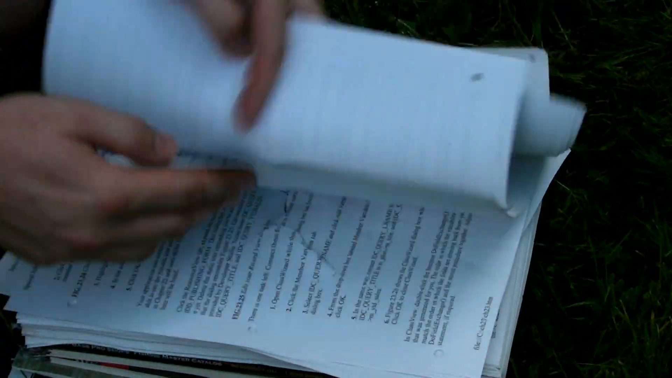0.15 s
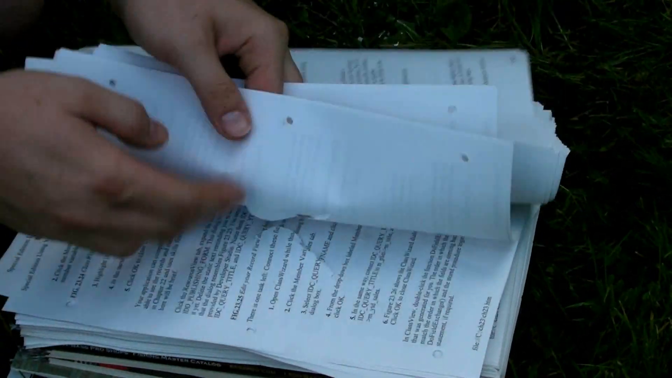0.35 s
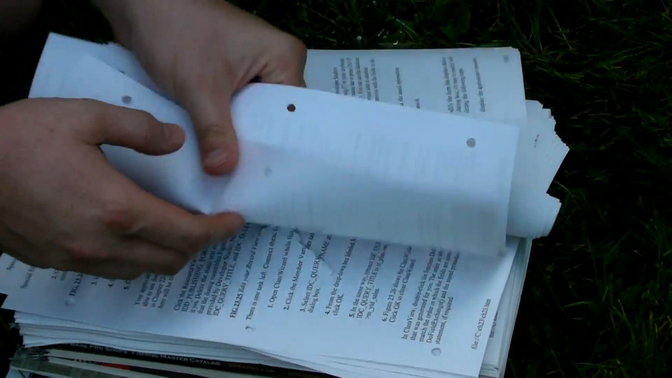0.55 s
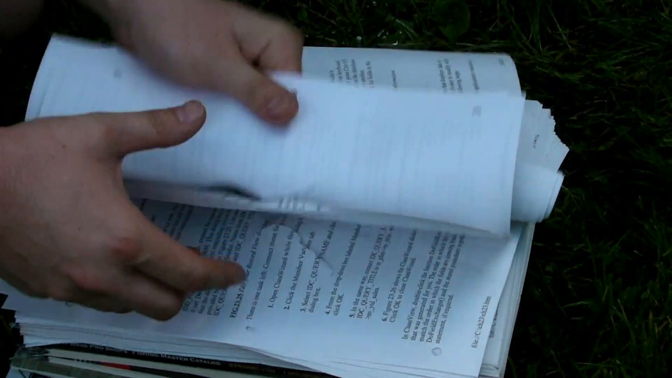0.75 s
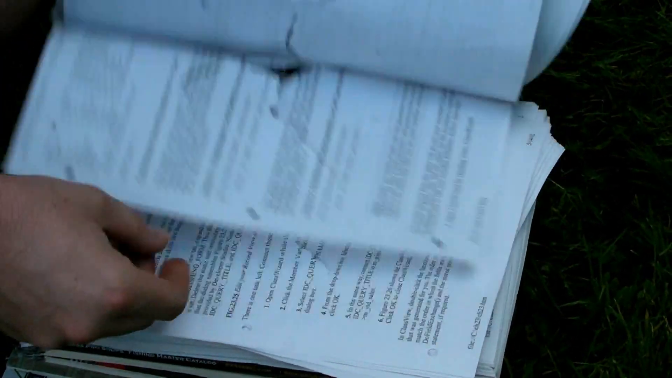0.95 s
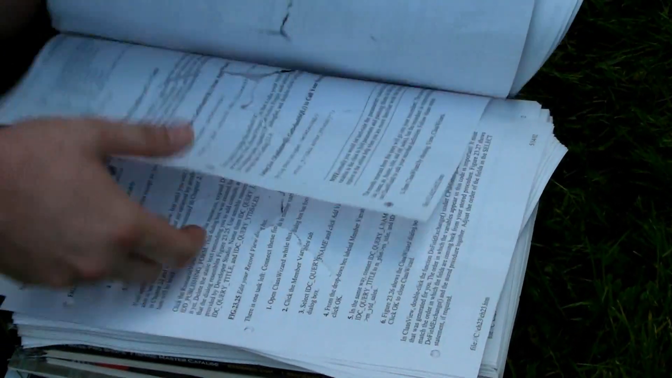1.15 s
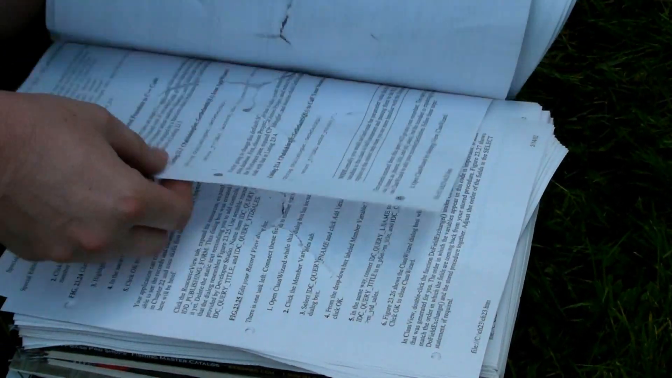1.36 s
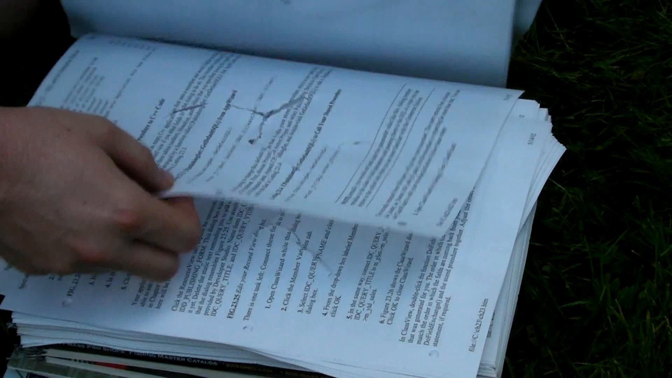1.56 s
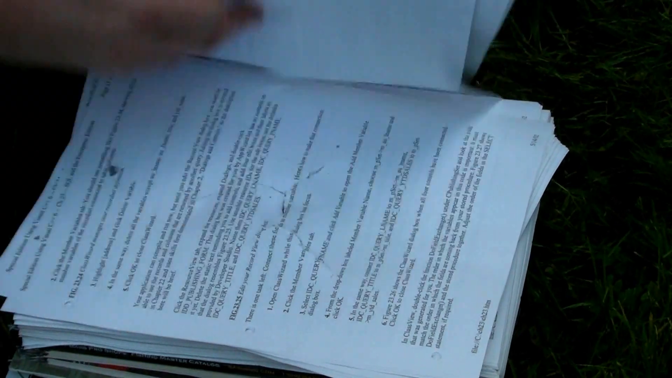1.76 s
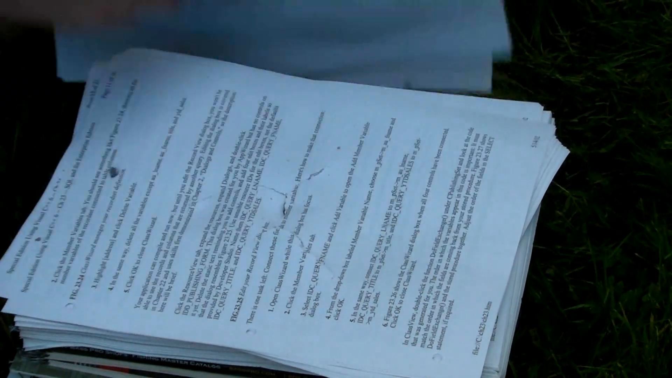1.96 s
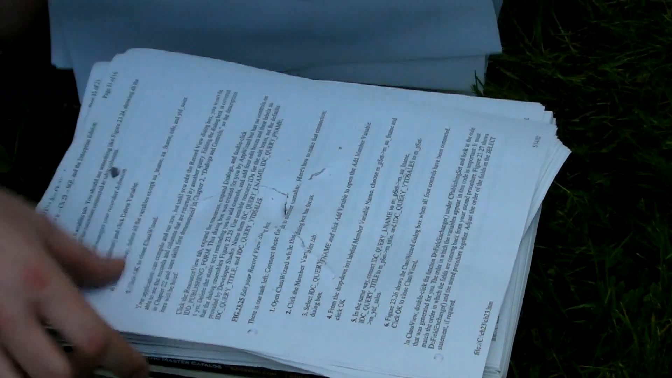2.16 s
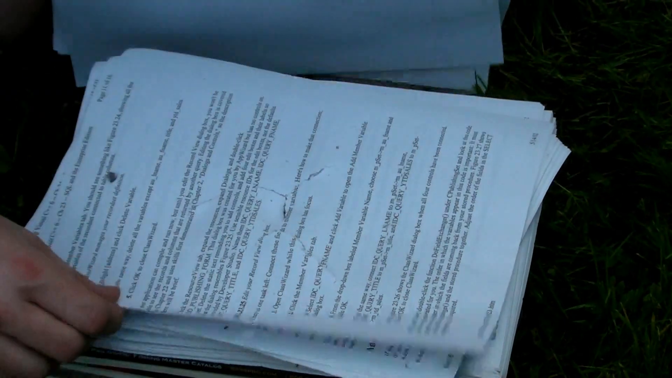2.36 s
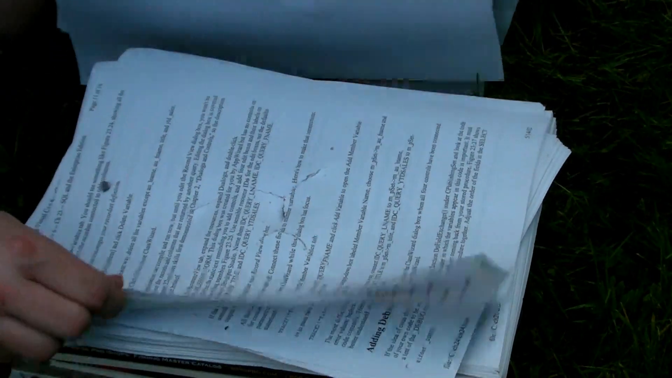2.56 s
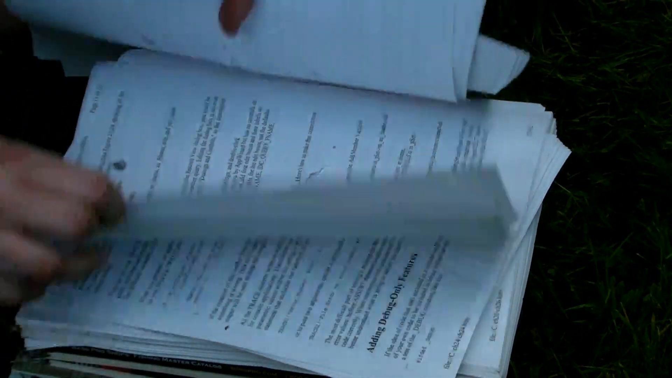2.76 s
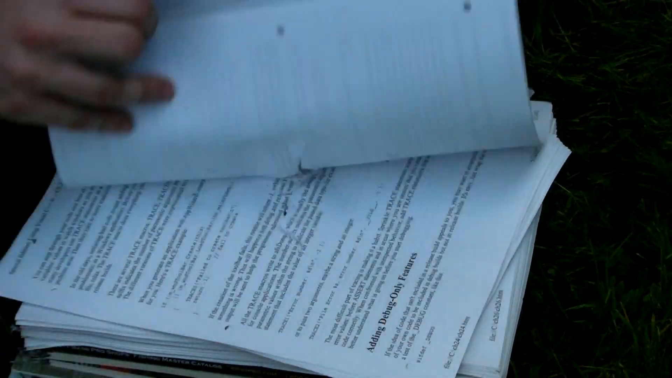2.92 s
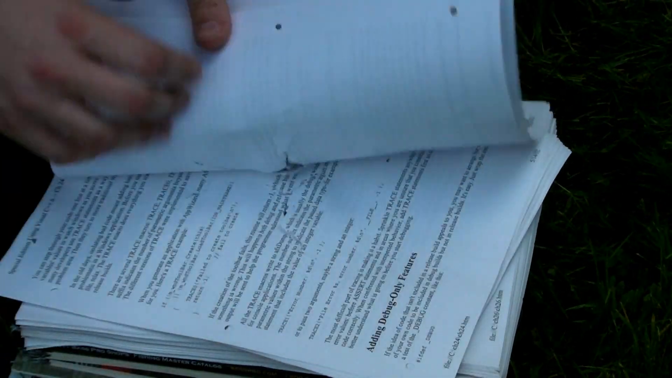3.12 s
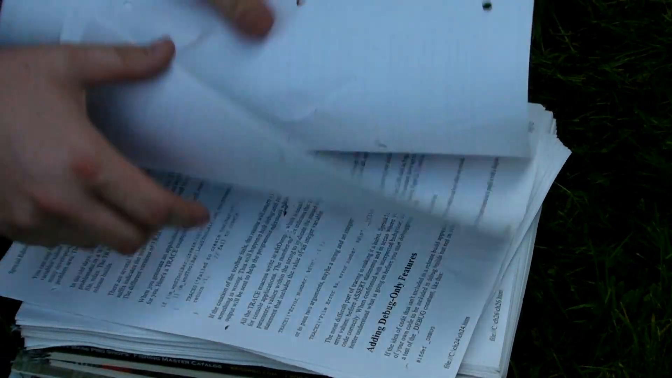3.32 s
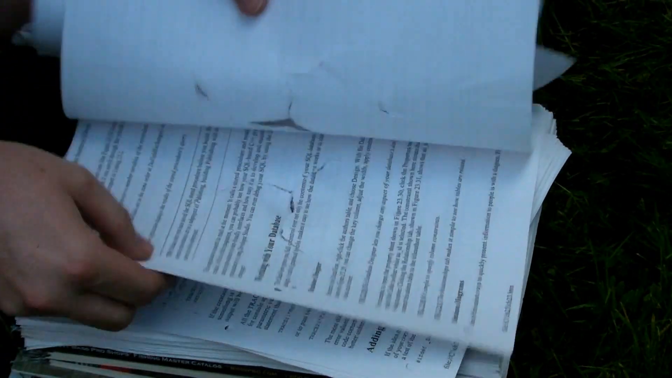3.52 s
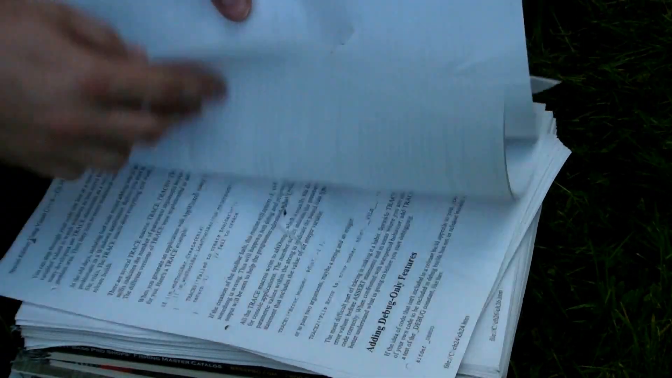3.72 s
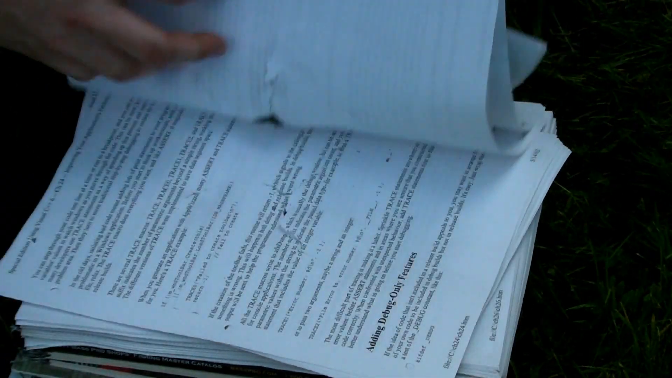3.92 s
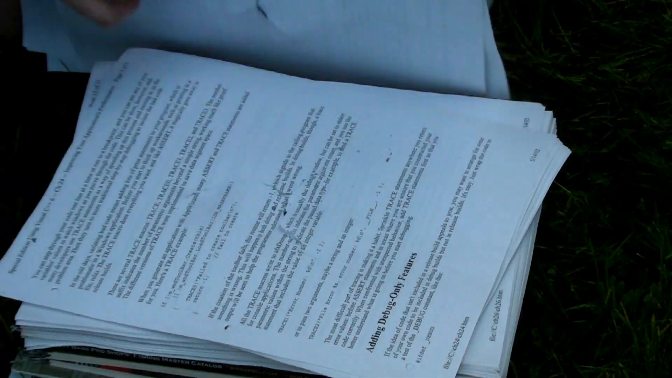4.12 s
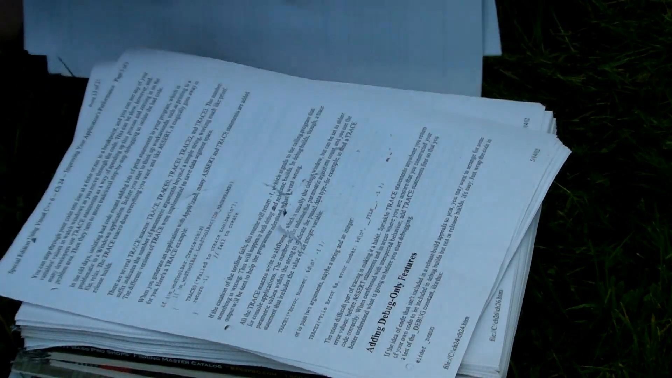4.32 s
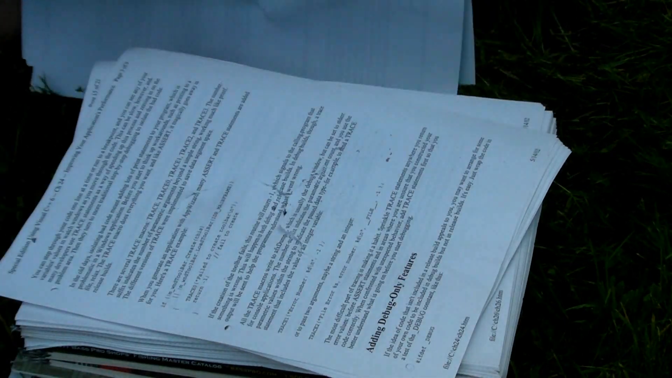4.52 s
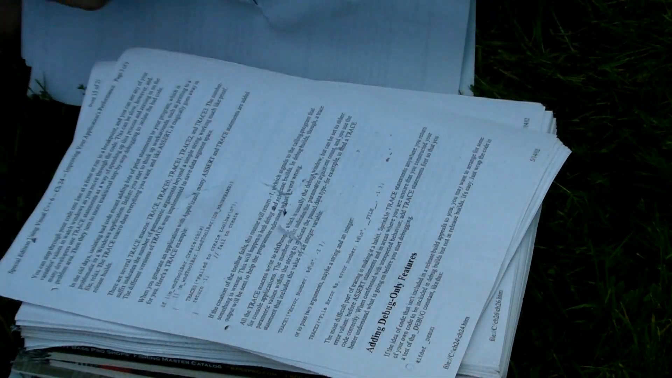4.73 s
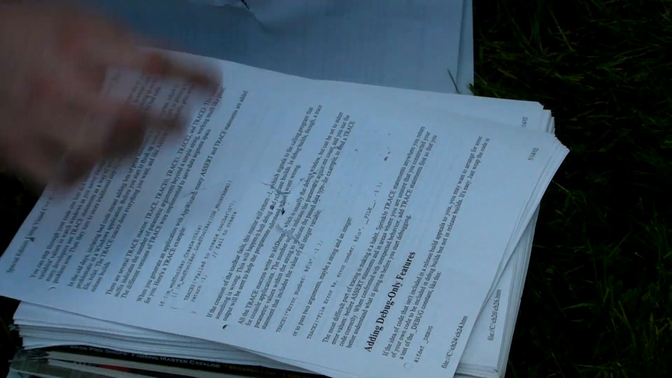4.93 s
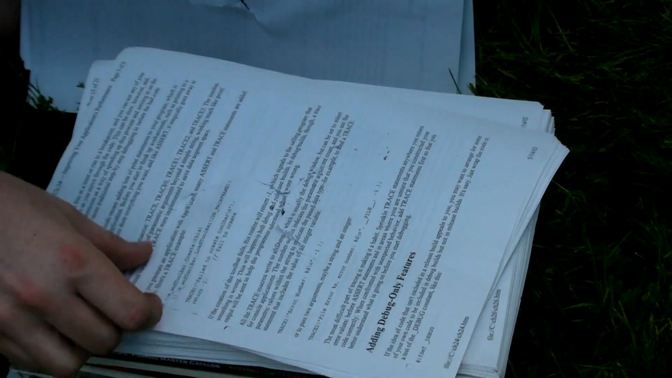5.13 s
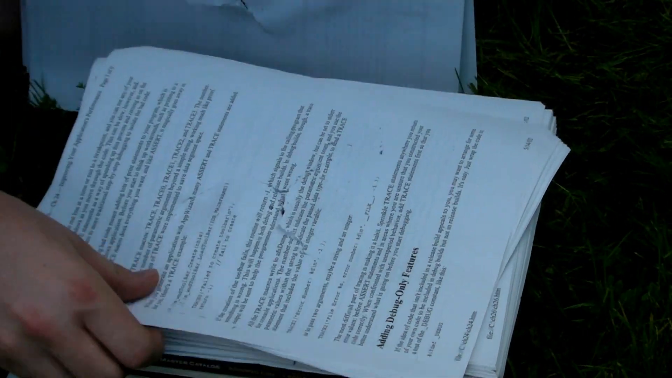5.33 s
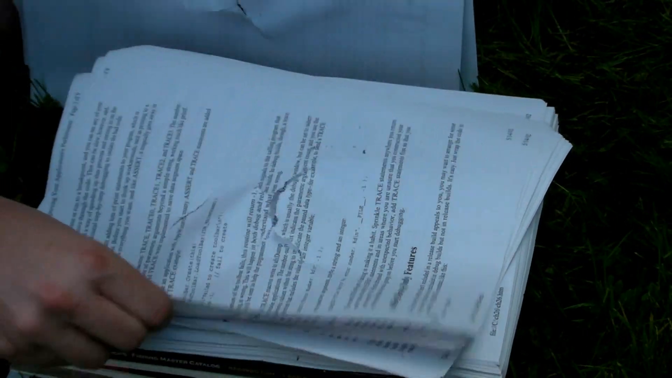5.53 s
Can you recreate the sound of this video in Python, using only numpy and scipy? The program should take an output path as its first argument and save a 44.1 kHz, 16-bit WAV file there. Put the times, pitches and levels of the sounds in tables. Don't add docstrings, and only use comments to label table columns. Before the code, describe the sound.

A thick stack of paper is leafed through by hand on grass, dry and very close to a small camera's stereo microphones. It starts with soft rustling; at 0.3 s a bundle flaps crisply, then bright swishes build from 0.5 s to a very hard snap at 0.7 s. Lighter swishes and ticks follow from 0.9 to 1.75 s. The loudest dragging scrape, with crackles, falls at 1.9-2.1 s, then a softer pause. Sheets swish again at 2.65-2.95 s, flap strongly at 3.1 s with brief airy falling hisses, and snap sharply at 3.48 and 3.64 s. Soft pats and fading slides last until about 4.3 s. Near quiet follows, with sparse ticks and a faint bird chirping around 4.75 s and 5.2-5.5 s, after barely audible chirps near 3.1-3.4 s. A crisp page lift bursts at 5.57 s. Low distant traffic hum and airy noise continue throughout.

```python
import sys
import numpy as np
from scipy import signal
from scipy.io import wavfile
from scipy.ndimage import uniform_filter1d

SR = 44100
rng = np.random.default_rng(int(sys.argv[2]) if len(sys.argv) > 2 else 0)


def nominal_scale(level):
    x = np.asarray(level, float) / 20
    return 10 ** x


def file_out(sig):
    cols = np.atleast_2d(sig).T
    lim = np.clip(cols, -1, 1)
    pcm = np.round(lim * 32767).astype(np.int16)
    wavfile.write(sys.argv[1], SR, pcm)


N = 246062

# frequency in Hz, left minus right in dB.
PORTS = [(60, -1), (180, -1.5), (550, -1), (1650, -1), (2800, -3), (4970, 1), (15000, 0)]
OPPOSITE = np.array([[1], [-1]])


def rms_one(x):
    return x / np.sqrt(np.mean(x ** 2) + 1e-20)


def at_hz(points, hz):
    points_hz, values = np.transpose(points)
    return np.interp(np.log(hz), np.log(points_hz), values)


def drift(rate_hz):
    r = np.exp(-16 * np.pi * rate_hz / SR)
    slow = signal.lfilter([1], [1, -2 * r, r * r], rng.standard_normal(N // 8 + 4002))
    slow = slow[4000:]
    return np.interp(np.arange(N) / 8, np.arange(len(slow)), rms_one(slow))


def band(x, low_hz, high_hz):
    sos = signal.butter(2, [low_hz, min(high_hz, .45 * SR)], "band", fs=SR, output="sos")
    return signal.sosfilt(sos, x)


def low_pass(x, top_hz):
    return signal.sosfilt(signal.ellip(12, .5, 60, top_hz, fs=SR, output="sos"), x)


def resonance(x, hz, width_hz):
    return signal.lfilter(*signal.iirpeak(hz, hz / width_hz, fs=SR), x)


def noise_bank(gain_db_at, likeness):
    out = 0
    white = rng.standard_normal((2, 2, N))
    edges_hz = 20 * 2 ** (np.arange(30) / 3)
    for k, (low, high) in enumerate(zip(edges_hz, edges_hz[1:])):
        mid, side = band(white[k % 2], low, high)
        hz = np.sqrt(low * high)
        alike = np.clip(at_hz(likeness, hz), 0, 1)
        pair = np.sqrt(1 + alike) * mid + np.sqrt(1 - alike) * side * OPPOSITE
        balance = nominal_scale(at_hz(PORTS, hz) / 2 * OPPOSITE)
        out = out + nominal_scale(gain_db_at(hz)) * balance * pair
    return out


def strokes():
    # time in s, hiss in dB, centre of the air-gap resonance in Hz.
    handling = [(0, -53.5, 2500), (.28, -41.5, 3850), (.4, -49, 2500), (.5, -39, 3850), (.82, -49, 4300),
                (1.1, -49, 3800), (1.25, -60, 3100), (1.62, -43, 3800), (1.8, -45, 2900),
                (2.28, -46.5, 2340), (2.5, -53.5, 2680), (2.98, -48.5, 3200), (3.45, -52, 3200),
                (3.85, -44.5, 2640), (4.5, -53.5, 3600), (5.18, -56, 3980), (5.42, -50.5, 3600),
                (5.58, -44.5, 3600)]
    # peak in s, hiss in dB, rise in s, fall in s,
    # bright edge in dB re hiss.
    swishes = [(.095, -42, 0.086, 0.083, -12), (.315, -57, 0.19, 0.044, 1),
               (0.532, -33, 0.015, 0.067, -3.5), (.629, -29.5, 0.083, 0.049, -7.5),
               (0.727, -34, 0.069, 0.053, -10), (.968, -34.5, 0.12, 0.42, -13),
               (1.491, -30, 0.12, 0.14, -10.5), (1.774, -42, 0.38, .008, -11.5),
               (1.915, -39.5, 0.025, 0.15, -5), (2.0, -36.5, 0.034, 0.047, -10.5),
               (2.664, -32, 0.044, 0.056, -12.5), (2.827, -34.5, 0.051, 0.061, -16),
               (2.928, -36.5, 0.054, 0.01, -16), (3.176, -31.5, 0.015, 0.22, -12),
               (3.527, -35.5, 0.1, 0.18, -13), (3.628, -34, 0.022, 0.16, -9.5),
               (3.722, -34, 0.039, 0.38, -16), (4.026, -37.5, 0.093, .25, -13.5),
               (4.161, -41, 0.67, 0.067, -11), (4.27, -44, 0.04, 0.37, -14),
               (4.57, -44.5, 0.1, 0.066, -14.5), (4.685, -43.5, 0.11, 0.097, -14.5),
               (4.909, -42, 0.025, 0.072, -14.5), (5.577, -33, 0.037, .05, -6)]
    # peak in s, hiss in dB, rise in s, fall in s, gap resonance in Hz.
    drags = [(0.335, -24.5, 0.0076, 0.026, 2800), (2.8, -35, 0.013, 0.075, 2800),
             (.584, -40, .05, 0.087, 3600), (.923, -32, 0.061, 0.02, 2580), (1.093, -37, 0.12, 0.15, 4150),
             (1.318, -34.5, 0.063, 0.033, 4000), (1.671, -38.5, 0.14, 0.061, 2250),
             (1.881, -43, 0.11, .05, 2600), (1.967, -17, 0.0094, 0.021, 2600),
             (1.938, -22, 0.031, 0.038, 2900), (2.06, -23.5, 0.027, 0.031, 2600),
             (3.26, -32, .06, 0.12, 2470), (4.794, -48, 0.19, 0.089, 3060), (5.278, -59, 0.098, 0.31, 4000)]
    # peak in s, hiss in dB, rise in s, fall in s,
    # flapping lows in dB re hiss.
    flaps = [(0.139, -35.5, 0.022, 0.032, -0.5), (.304, -58.5, 0.15, 0.078, 11.5),
             (0.367, -27, 0.031, 0.006, -5), (.629, -27, 0.0094, 0.058, -9.5),
             (1.747, -32, 0.027, 0.0093, -0.5), (1.9, -32, 0.041, 0.23, -8), (2.943, -53, 0.039, 0.018, 17),
             (3.069, -35, 0.066, 0.063, -3.5), (3.117, -25.5, 0.015, 0.018, 0),
             (3.099, -21, 0.0061, 0.022, -11), (3.22, -29.5, 0.019, 0.11, 0.5),
             (3.515, -42.5, 0.013, 0.029, 11), (3.597, -38.5, 0.073, 0.036, -6),
             (3.639, -22.5, 0.0032, 0.036, -4.5), (3.9, -37.5, 0.12, 0.03, -4),
             (4.03, -53.5, 0.45, 0.23, 7.5), (5.577, -45, 0.037, .05, 5)]
    slope_db = 21

    t = np.arange(0, N + 64, 64) / SR
    s, rest_db, rest_hz = np.transpose(handling)
    hiss = nominal_scale(2 * np.interp(t, s, rest_db))
    lows, edge = hiss * nominal_scale(2 * -14), hiss * nominal_scale(2 * -16)
    tuned = hiss * np.interp(t, s, rest_hz)

    rows = [(*row[:4], 4160, -16.5, row[4]) for row in swishes]
    rows += [(*row, -23.5, -29) for row in drags]
    rows += [(*row[:4], 2500, row[4], -27) for row in flaps]
    for peak, db, rise, fall, hz, lows_db, edge_db in rows:
        away = np.maximum((peak - t) / rise, (t - peak) / fall)
        power = nominal_scale(2 * (db - slope_db * away))
        hiss = hiss + power
        lows = lows + power * nominal_scale(2 * lows_db)
        edge = edge + power * nominal_scale(2 * edge_db)
        tuned = tuned + power * hz
    controls = 10 * np.log10(hiss), tuned / hiss, 10 * np.log10(lows), 10 * np.log10(edge)
    return [np.interp(np.arange(N) / SR, t, control) for control in controls]


def sliding():
    # frequency in Hz, level in dB per Hz within each zone.
    sheet = [(250, -34), (500, -41), (750, -4.5), (1300, -7.5), (2500, -2.5), (4200, -5.5), (6500, -10),
             (9000, -8.5), (12000, -12.5), (16000, -18.5)]
    # frequency in Hz, left-right likeness of a source close to the ports.
    near_likeness = [(500, 0.96), (6800, 1), (10000, 0.84), (15000, 0.91)]
    hiss_db, centre_hz, lows_db, bright_db = strokes()

    ticks = (rng.random(N) < 200 / SR) * np.minimum(rng.exponential(.4, N), .8)
    slips_db = 20 * np.log10(1 + signal.lfilter([1], [1, -.97], ticks))
    catching_db = 1.8 * drift(300) + slips_db
    sharpness_db = np.clip((hiss_db + 56) / 4, 2, 6.5)

    def gain_db(hz):
        to_low = np.clip(np.log2(1700 / hz) / 0.41, 0, 1)
        to_high = np.clip(np.log2(hz / 5500) / 0.76, 0, 1)
        gap_db = sharpness_db * (np.exp(-(np.log2(hz / centre_hz) / .27) ** 2) - .6)
        zone_db = (lows_db + 10.0) * to_low + (bright_db + 8.5) * to_high
        zone_db = zone_db + (hiss_db + gap_db + 3.5) * (1 - to_low - to_high)
        return zone_db + at_hz(sheet, hz) + catching_db + 2.02 * drift(22.7)

    return noise_bank(gain_db, near_likeness)


def creases():
    # time in s, peak in dB, pitch in Hz, length in ms.
    cracks = [(.206, -27, 2700, 14), (.351, -12, 3600, 5.3), (.7143, 0.5, 3850, 3.8),
              (.868, -23, 5900, 3.1), (.905, -27, 5840, 2), (.9454, -21, 3970, 3.3),
              (1.5675, -19.5, 2930, 5.2), (1.733, -22, 3020, 2.2), (4.072, -23.5, 3030, 2.7),
              (1.911, -17, 2500, 2), (2.0463, -13, 3970, 2.8), (2.3715, -29, 4070, 7.3),
              (2.6668, -10, 3200, 1.7), (2.887, -32, 5800, 2), (3.219, -18, 5830, 4.4),
              (2.9142, -15.5, 3180, 2.1), (3.099, -14.5, 4450, 0.78), (2.929, -17, 5300, 3.7),
              (3.112, -13, 2770, 0.9), (3.2378, -11.5, 4250, 1.7), (3.397, -36, 5530, 2),
              (3.032, -28, 4970, 2.5), (3.251, -20, 2660, 7.3), (3.482, -4.5, 3040, 4),
              (3.638, -1, 4220, 1.6), (4.095, -24.5, 1650, 1.4), (4.132, -26.5, 1820, 2.2),
              (5.294, -33.5, 4160, 6.9), (5.557, -21, 1840, 1.1), (5.5575, -25, 6000, 2.7),
              (5.427, -31, 5030, 1.9)]
    dry_ticks = [(.366, -17, 2140, 3), (.647, -19, 2240, 5), (.75, -18, 4730, 14), (.829, -30, 2060, 4.2),
                 (1.0145, -14, 3220, 2.2), (1.4046, -25.5, 2860, 13), (1.392, -28.5, 2620, 5),
                 (1.501, -19.5, 3900, 3.4), (1.512, -24, 4500, 4.3), (1.619, -34, 2210, 3),
                 (1.638, -25.5, 2350, 4.3), (1.654, -27, 2300, 2.8), (1.706, -32, 3000, 3),
                 (1.7165, -20, 2550, 3), (1.75, -24, 2600, 2.7), (3.86, -29, 2500, 8),
                 (4.027, -36, 3500, 2), (1.6882, -8, 2260, 2.9), (1.67, -35, 1700, 3),
                 (1.9405, -11, 2560, 1.5), (1.9648, -4.5, 3650, 2.5), (1.853, -22, 2580, 6),
                 (1.982, -34, 2620, 2.1), (2.0586, -7.5, 2900, 1.9), (2.0675, -19, 2560, 6),
                 (2.088, -28, 3000, 5.1), (2.108, -22.5, 2630, 2.4), (2.146, -17.5, 2570, 2.9),
                 (2.433, -29, 1730, 4.4), (3.0656, -18.5, 2700, 4.3), (3.7134, -23, 2270, 9.8),
                 (4.184, -27, 4500, 2), (4.222, -33.5, 1800, 3.4), (4.2407, -26, 1700, 3.2),
                 (4.2435, -27, 4200, 2), (4.3275, -32, 2100, 4), (4.3824, -29, 1860, 3.6),
                 (4.383, -33, 4200, 2.3), (4.4867, -36, 3470, 3), (4.706, -25.5, 3840, 0.68),
                 (4.9, -36, 2650, 4.1), (5.426, -29, 2180, 2.7), (5.405, -39, 2400, 3),
                 (4.704, -39, 2100, 3.4), (4.836, -38, 2500, 3), (3.4023, -25, 2360, 3.5),
                 (3.2225, -20, 2500, 2), (3.245, -25, 2380, 2.5)]
    flips = [(.087, -20.5, 2280, 2.8), (.358, -17, 2490, 10), (.6318, -12, 3000, 2.5),
             (.6595, -14.5, 1520, 2.3), (.661, -11.5, 4500, 2), (.665, -16, 2570, 5),
             (.77, -22.5, 2330, 2.3), (.8862, -21.5, 4270, 3), (.887, -31, 1920, 2.5),
             (.8875, -24, 6200, 1.7), (1.0442, -11.5, 2900, 5.1), (1.1065, -17.5, 2000, 3.1),
             (1.116, -25, 1840, 1.9), (1.4834, -25, 4300, 3.8), (1.6785, -19, 2170, 5.9),
             (1.728, -36, 2000, 3.8), (1.8005, -22.5, 2950, 4.8), (1.8462, -16.5, 2350, 4),
             (1.899, -18, 3600, 4), (2.0244, -22.5, 2190, 6.8), (2.7138, -24.5, 2930, 5.5),
             (2.746, -36, 2220, 1.7), (2.925, -24, 2780, 2), (2.93, -21.5, 2350, 3.6),
             (3.177, -44, 2190, 1.7), (3.2692, -19, 2050, 1.4), (3.2885, -12.5, 2950, 2.8),
             (3.6745, -22, 1200, 18), (4.193, -26.5, 3710, 1.6), (4.667, -33, 2110, 5.1),
             (5.5745, -12, 1610, 2.7), (5.5755, -10, 3000, 2.3), (5.575, -13, 4600, 5.3)]
    knocks = [(.3182, -16, 2020, 1.5), (.322, -30, 2220, 4.6), (.3325, -16.5, 1620, 4.3),
              (.373, -21.5, 1970, 3.5), (.439, -31.5, 1850, 8.2), (.9118, -14.5, 2500, 1.4),
              (.9975, -24, 3600, 4), (1.032, -40, 1400, 4.3), (1.318, -31, 2510, 4.4),
              (1.668, -36, 2170, 2), (1.889, -24, 2310, 3.3), (2.619, -29.5, 2170, 2.3),
              (3.031, -27.5, 2320, 5.2), (3.2185, -16.5, 1340, 6.7), (3.353, -21, 2390, 1.8),
              (3.4362, -18.5, 2380, 4.9), (3.612, -26.5, 2030, 4), (3.7655, -23.5, 2050, 1.7),
              (3.822, -12.5, 2700, 2.6), (4.0, -25, 4680, 2.5), (4.048, -34, 2940, 6.9)]
    thuds = [
        (.1375, -24, 2660, 2.4),
        (2.997, -31.5, 2880, 5.1),
        (3.407, -34, 1530, 5.8),
        (3.341, -37, 1730, 7.5),
        (3.5754, -28.5, 1430, 8.4),
        (3.774, -25, 1500, 5.6),
        (3.972, -28.5, 1440, 3.4),
    ]
    pats = [(.089, -40, 1400, 1.6), (.203, -43, 1400, 6.4), (.222, -43, 1390, 6.8), (.292, -40, 1400, 4.8),
            (.42, -42, 1400, 4.9), (2.938, -31, 1420, 2.8), (3.036, -38, 1400, 5.1),
            (3.056, -33, 1410, 4.7), (3.184, -43, 1420, 5), (3.198, -39, 1400, 5), (3.241, -35, 1400, 5.1),
            (3.253, -37, 1400, 3.8), (3.262, -34, 1400, 2.4), (3.71, -38, 1400, 3.5),
            (3.864, -43, 1400, 3.8), (3.893, -32, 1400, 5.8), (3.911, -40, 1400, 3),
            (3.902, -28, 2600, 3.2), (3.927, -34.5, 1400, 3.9), (3.948, -40, 1400, 2.6),
            (3.999, -39, 1400, 1.1), (4.012, -47, 1400, 2.8), (4.024, -51, 1400, 2.7),
            (4.047, -41, 1410, 3.4), (4.056, -33, 1400, 4.1), (4.07, -34.5, 1400, 2.3)]
    # kind, lows in dB re peak, highs in dB re peak
    kinds = [(cracks, -19, -7), (dry_ticks, -59, -48), (flips, -14.5, -28),
             (knocks, -7.5, -19), (thuds, 0.59, -16), (pats, 5.2, -14)]
    return sorted((s, db, hz, lows_db, highs_db, ms / 1000)
                  for rows, lows_db, highs_db in kinds for s, db, hz, ms in rows)


def snaps():
    size = 2048
    out = np.zeros((2, N + size))
    t = np.arange(size) / SR
    s, peak_db, hz, lows_db, highs_db, length = np.transpose(creases())[:, :, None]
    a, b, c, side = rng.standard_normal((len(s), 4, size)).transpose(1, 0, 2)
    a, b = a * np.abs(a), b * np.abs(b)
    a[:, 12], b[:, 12], c[:, 12] = 11, -11, 11
    length = np.clip(length, .001, .012)
    rise = length * np.clip(-peak_db / 150, .05, .22)

    def rattle(share):
        decay = np.exp(-(t / (share * length)) ** 1.4)
        tail = .05 * np.exp(-t / (3 * share * length))
        return np.tanh(t / rise) * (decay + tail)

    broad = np.clip(.33 + (peak_db[:, 0] + 12) / 14, .33, .8)
    body = []
    for p, q, f, w in zip(a * rattle(.85), b * rattle(.8), hz[:, 0], broad):
        pitched = band(p, f / 1.18, f * 1.18)
        body.append(pitched + w * band(q, 1300, min((1.3 + 1.3 * w) * f, 7000)))
    body = band(body, 900, 7000)

    lows = band(band(c * rattle(1.), 700, 1350), 600, 1600)
    deep = band(band(a * rattle(1.6), 250, 430), 220, 480)
    lows = lows + 32 * length * deep
    highs = band(b * rattle(.6), 6500, 11500) + .6 * band(b * rattle(.5), 11500, 16500)
    highs_db = highs_db + 0.21 * (peak_db + 13)

    bursts = 0
    for db, part in [(-.6, body), (lows_db, lows), (highs_db, highs)]:
        bursts = bursts + nominal_scale(db) * part / np.abs(part).max(axis=1, keepdims=True)
    aparts = nominal_scale(-20.5) * band(side * np.abs(bursts), 500, 12500)
    starts = np.round(s[:, 0] * SR).astype(int)
    for at, gain, burst, apart in zip(starts, nominal_scale(peak_db), bursts, aparts):
        out[:, at:at + size] += gain * (burst * nominal_scale(-.3 * OPPOSITE) + apart * OPPOSITE)
    presence = band(out, 1300, 7000) * (nominal_scale(-.7 * OPPOSITE) - 1)
    return (out + presence)[:, :N]


def wedges():
    # start in s, length in s, first pitch in Hz, last pitch in Hz, level in dB.
    squeezes = [
        (.531, .1, 6200, 3400, -30.5),
        (.55, .06, 5600, 6700, -38),
        (3.174, .05, 4700, 2700, -32),
        (3.235, .04, 3100, 2100, -35),
    ]
    bend = 6
    out = np.zeros(N)
    noises = rng.standard_normal((len(squeezes), 2, 8192))
    for (s, length, first_hz, last_hz, db), noise in zip(squeezes, noises):
        u = np.arange(round(length * SR)) / (length * SR)
        at = round(s * SR)
        hz = first_hz + (last_hz - first_hz) * (1 - np.exp(-bend * u)) / (1 - np.exp(-bend))
        narrow = signal.butter(2, .18 * last_hz, fs=SR, output="sos")
        a, b = rms_one(signal.sosfilt(narrow, noise))[:, -len(u):]
        phase = 2 * np.pi * np.cumsum(hz) / SR
        swell = np.sqrt(np.sin(np.pi * np.sqrt(u)))
        out[at:at + len(u)] += nominal_scale(db) * swell * (a * np.cos(phase) + b * np.sin(phase))
    return out * nominal_scale(-.7 * OPPOSITE)


def bird():
    # start in s, length in s, first pitch in Hz, last pitch in Hz, level in dB.
    chirps = [(3.12, .045, 2850, 3150, -50), (3.29, .06, 2600, 2800, -45), (3.35, .075, 2750, 3200, -47),
              (4.738, .035, 2450, 2900, -51), (4.746, .014, 4300, 4100, -48),
              (4.756, .014, 3200, 4400, -48), (4.783, .012, 4250, 4100, -43), (4.85, .012, 2500, 3100, -50),
              (5.225, .075, 3690, 3720, -53), (5.26, .032, 3700, 4400, -45), (5.286, .012, 4400, 5100, -48),
              (5.288, .036, 4300, 3750, -49), (5.303, .02, 5000, 4000, -50), (5.32, .038, 3400, 2780, -44),
              (5.364, .012, 4000, 3400, -48), (5.403, .012, 3200, 3300, -48),
              (5.458, .036, 3000, 3300, -45)]
    out = np.zeros(N)
    flutter_db = 2.5 * drift(90)
    waver = 1 + .005 * drift(70)
    for s, length, first_hz, last_hz, db in chirps:
        u = np.arange(round(length * SR)) / (length * SR)
        at = round(s * SR)
        hz = (first_hz + (last_hz - first_hz) * u) * waver[at:at + len(u)]
        whistle = np.sin(2 * np.pi * np.cumsum(hz) / SR)
        out[at:at + len(u)] += nominal_scale(db) * np.sin(np.pi * u) * whistle
    return out * nominal_scale(flutter_db + 3) * nominal_scale(-.5 * OPPOSITE)


def outdoors():
    # frequency in Hz, level in dB per Hz.
    air_colour = [(110, -88), (190, -7), (454, -4), (589, -3), (1090, -7.5), (1460, -5.5), (1570, -19),
                  (2460, -4.5), (7760, -21), (16000, -22.5)]
    # frequency in Hz, left-right likeness of sound from far off.
    far_likeness = [(60, 0.67), (240, 0.66), (950, 0.44), (3770, 0.021), (15000, 0.064)]
    air = rms_one(noise_bank(lambda hz: at_hz(air_colour, hz) + 2.0 * drift(4.4), far_likeness))
    mid, side = rng.standard_normal((2, N))
    rumble = mid + 0.34 * side * OPPOSITE
    drone = resonance(rumble, 123, 36) + nominal_scale(-5.0) * band(rumble, 61, 152)
    drone_db = -54 + 1.53 * drift(6.8) + PORTS[1][1] / 2 * OPPOSITE
    return nominal_scale(-49.5 + 1.16) * air + nominal_scale(drone_db) * rms_one(drone)


def scene():
    return sliding() * nominal_scale(6.5) + snaps() + wedges() + bird() + outdoors()


def roll_off(x):
    return signal.sosfilt(signal.butter(12, 17000, fs=SR, output="sos"), x)


def record(dry):
    # frequency in Hz, width in Hz, share removed.
    housing_dips = [(620, 140, .25), (3150, 600, .3)]
    for hz, width_hz, share in [*housing_dips, (7850, 330, .87)]:
        dry = dry - share * resonance(dry, hz, width_hz)
    hard = uniform_filter1d(np.abs(dry).max(axis=0), size=128) > .14
    open_top = np.clip(2 * uniform_filter1d(hard * 1., size=192), 0, 1)
    kept = low_pass(dry * (1 - open_top), 15730) + dry * open_top
    last_cut = signal.cheby2(12, 50, 16800, fs=SR, output="sos")
    mix = signal.sosfilt(last_cut, np.clip(kept, -.93, .93))
    return roll_off(mix)


dry = scene()
out = record(dry)
file_out(out)
```